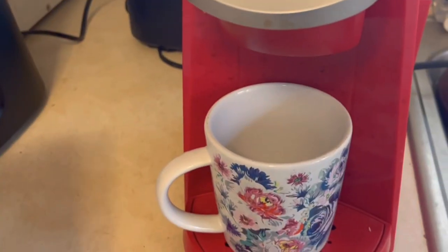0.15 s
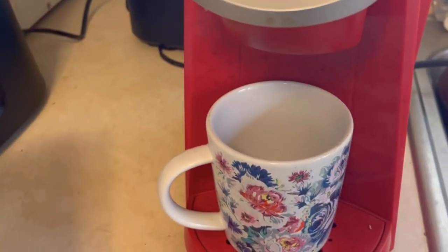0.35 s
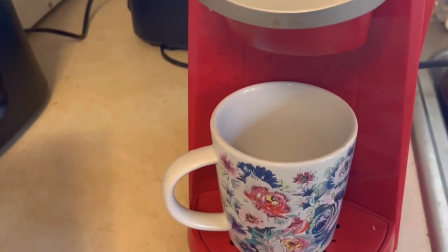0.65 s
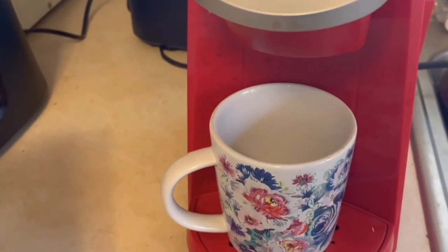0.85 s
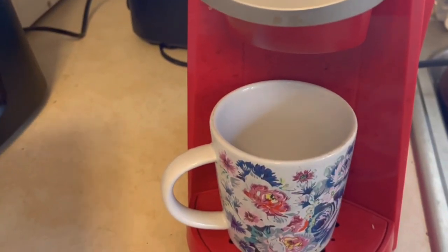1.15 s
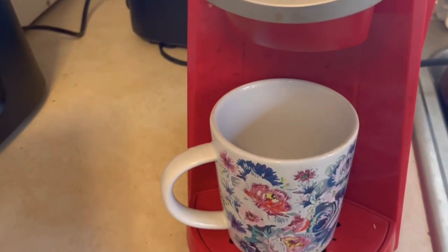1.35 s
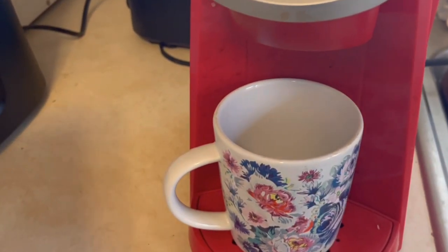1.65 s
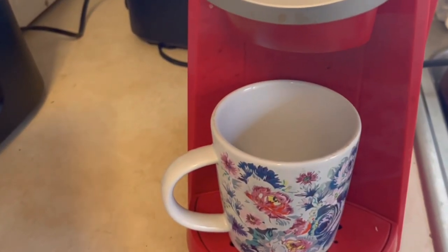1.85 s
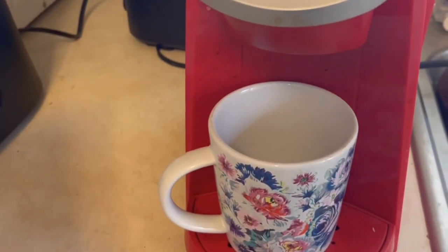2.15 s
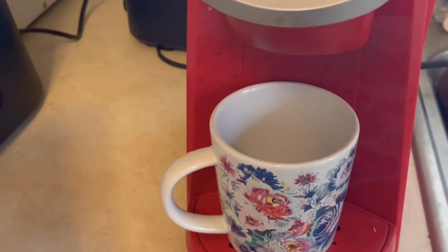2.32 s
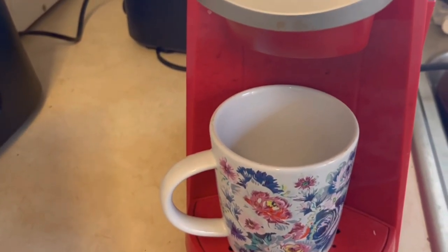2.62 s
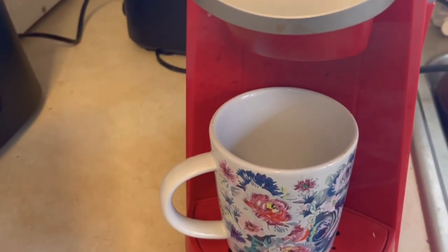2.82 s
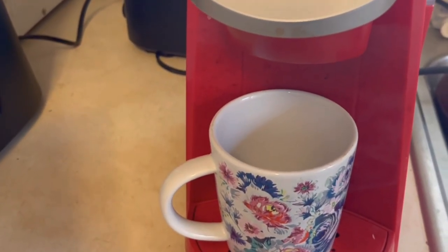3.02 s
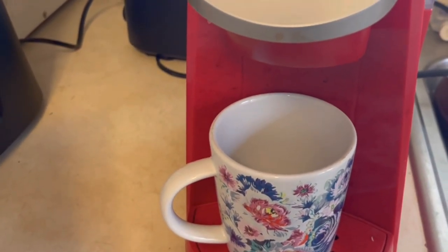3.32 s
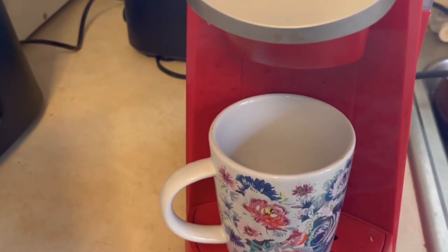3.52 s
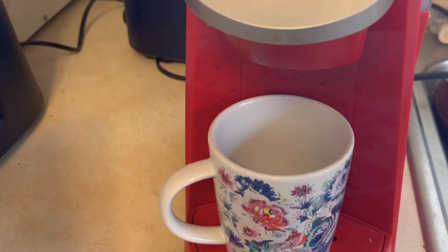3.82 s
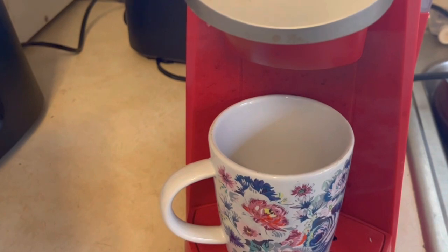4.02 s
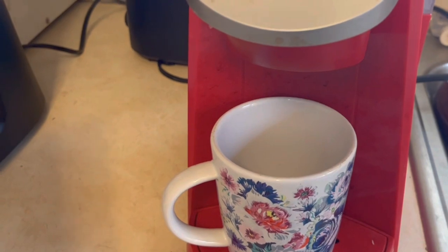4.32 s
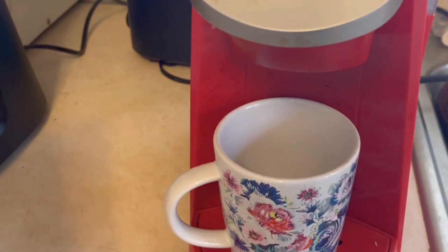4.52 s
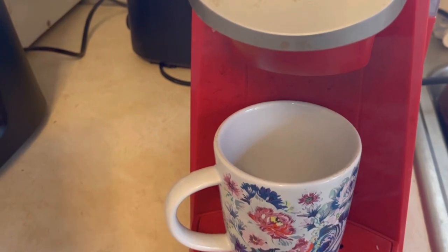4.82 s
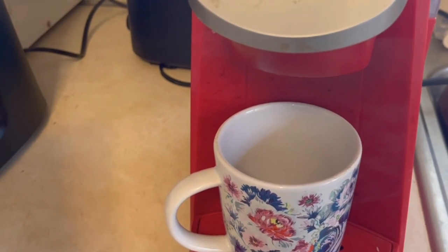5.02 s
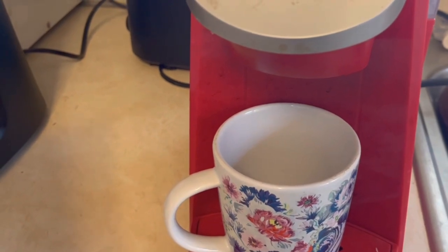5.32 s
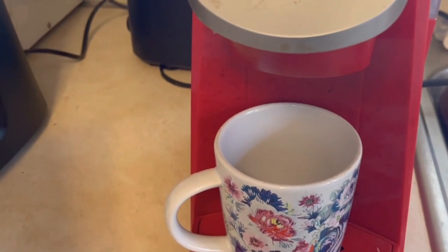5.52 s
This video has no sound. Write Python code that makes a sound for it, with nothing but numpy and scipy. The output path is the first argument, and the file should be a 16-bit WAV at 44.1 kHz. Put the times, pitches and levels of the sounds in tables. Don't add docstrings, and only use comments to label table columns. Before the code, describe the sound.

A coffee maker's drive is already running, rubbing and groaning quietly with irregular plastic ticks. Five similar strokes follow one another, each with a single knock in the middle and a sharp double knock at the end, then a short lull. Beneath are a low vibrating rumble and an even far-off hiss. Small puffs of steam and a few soft bumps appear. Heard near the machine in a lightly echoing kitchen.

```python
import sys
import numpy as np
from scipy import signal
from scipy.fft import rfft, irfft, next_fast_len
from scipy.io import wavfile
from scipy.ndimage import uniform_filter1d, map_coordinates

SR = 44100
rng = np.random.default_rng(int(sys.argv[2]) if len(sys.argv) > 2 else 0)


def rack_gain(trim_db):
    fader = np.asarray(trim_db, float)
    return 10 ** (fader / 20)


def bounce(signal):
    frames = np.transpose(np.atleast_2d(signal))
    limited = np.clip(frames, -1, 1)
    pcm = np.round(limited * 32767).astype(np.int16)
    wavfile.write(sys.argv[1], SR, pcm)


N = 250047

# frequency_hz, density_db (per Hz)
FAR_SPECTRUM = [(150, -20), (240, -10), (420, -8.5), (650, -14), (1100, -10), (1400, -2), (1700, 0),
                (1800, -17), (2400, -17.5), (3200, -25.5), (5500, -25), (7400, -27.5), (8300, -23),
                (9200, -31.5), (15600, -41)]
# frequency_hz, likeness (-1 to 1)
FAR_LIKENESS = [(60, 0.99), (290, 0.8), (640, 0.57), (1400, 0), (15000, 0.46)]
# frequency_hz, density_db (per Hz)
RUMBLE_SPECTRUM = [(13, -50), (22, -37), (46, -1.5), (70, 0.5), (124, -4), (155, -12.5), (232, -13),
                   (260, -12.5), (340, -25), (570, -120)]
# centre_s, change_db, half_width_s
RUMBLE_SWELLS = [(.45, 3, .15), (1.04, 6, .12), (1.43, 3, .06), (1.53, -7, .04), (1.68, 4, .06),
                 (1.97, 10, .08), (2.35, -3, .06), (3.27, 6, .07), (3.46, 0.5, .05), (3.8, -5, .1),
                 (4.13, 3, .05), (4.57, 3, .05), (4.9, -6, .06), (5.3, 1.5, .06)]
# start_s, rub_db, groan_db, strain_db
STROKES = [
    (-.1, -59, -55, 5),
    (1.07, -60, -56.5, 6),
    (2.22, -60.5, -58, 9.5),
    (3.385, -61.5, -59, 7),
    (4.575, -61, -59, 11),
]
# frequency_hz, width_hz, level_db
HOUSING_MODES = [(814, 94, -4), (1130, 57, 2), (1520, 123, 0), (2165, 177, -9.5), (2650, 650, -12.5),
                 (3350, 700, -15), (4150, 800, -19), (5100, 1560, -27)]
# frequency_hz, width_hz, level_db
BASE_MODES = [(178, 87, -2.5), (248, 93, 1), (305.8, 41.4, 3), (448, 35.7, -0.5), (536, 45.4, -2),
              (713, 91, -11)]
# frequency_hz, width_hz, level_db
THIN_PART_MODES = [(2510, 360, 3.5), (3350, 380, -2.5), (4040, 500, -12.5), (4980, 460, -20)]
# frequency_hz, density_db (per Hz)
WHIR_SPECTRUM = [(4500, -36), (6000, -11), (8000, -4.5), (9400, 2), (11000, -3.5), (15500, -6.5)]
# start_s, peak_db, pitch_hz
CATCHES = [(0.0303, -50.5, 2100), (0.3298, -48, 1180), (1.0795, -59, 1670), (1.1154, -45.5, 1610),
           (2.2639, -45.5, 1647), (2.5188, -47, 1350), (3.4321, -48, 1694), (4.6048, -50, 1590),
           (4.8907, -46, 1250)]
# start_s, peak_db, pitch_hz, edge_db
SLIPS = [(0.1173, -43.5, 1120, -20), (0.2111, -37, 1178, -22), (0.265, -43, 1260, -20),
         (1.3835, -40, 1194, -9), (1.4077, -39.5, 1450, -12), (1.4976, -46.5, 1153, -8),
         (2.554, -44.5, 1260, -27), (2.6, -47.5, 1520, -12), (3.5854, -49, 1150, -17),
         (3.7199, -41, 1626, -22), (3.8396, -45, 1150, -20), (4.7641, -44, 1160, -16),
         (4.9, -41, 1437, -13), (5.3323, -57, 1240, -18)]
# start_s, peak_db, pitch_hz
JOLTS = [(1.122, -50, 1150), (1.1885, -54, 1520), (1.4712, -54, 1150), (1.539, -41, 1150),
         (2.6903, -44, 1180), (3.8756, -40.5, 1520), (5.0536, -40.5, 1152)]
# start_s, peak_db, pitch_hz
CRACKS = [(0.2921, -35.5, 980), (2.3782, -52, 1150), (5.127, -50, 1500)]
# start_s, peak_db, thud_db, snap_db
MID_KNOCKS = [(0.1397, -32, -11, -37), (1.289, -33.5, -8.5, -36), (2.4439, -32.5, -13, -39),
              (3.6143, -32.5, -13, -37.5), (4.7935, -32.5, -10.5, -37)]
# start_s, peak_db, thud_db, snap_db
LEAD_KNOCKS = [(0.4218, -26.5, -12.5, -51), (1.575, -27, -12, -44), (2.7362, -27, -14, -50),
               (3.9114, -26, -14, -51), (5.0923, -27, -11.5, -52)]
# start_s, peak_db, thud_db, snap_db
END_KNOCKS = [(0.4619, -28, -16, -38), (1.6191, -28.5, -16.5, -40.5), (2.7806, -28, -15, -41),
              (3.9539, -28, -15.5, -40), (5.1394, -29.5, -14.5, -39.5)]
# delay_s, level_db, contact_ms
MID_BOUNCES = [(-.0065, -12, .12), (-.0042, -6, .11), (0, -2, .07), (.0015, -1, .035), (.0032, -2, .04),
               (.0062, -2, .04), (.0078, -5, .04), (.0104, -7, .05), (.014, -8, .08), (.018, -11, .09)]
# delay_s, level_db, contact_ms
LEAD_BOUNCES = [(0, -1, .05), (.0022, -2, .06), (.0047, -4, .06), (.0085, 0, .07), (.0108, -3, .08),
                (.0135, -8, .09), (.017, -10, .1)]
# delay_s, level_db, contact_ms
END_BOUNCES = [(-.0042, -2, .1), (.0005, -1, .035), (.0023, -1, .035), (.0045, -4, .045), (.008, -4, .045),
               (.0112, -10, .06), (.015, -11, .07), (.032, -13, .07)]
# frequency_hz, width_hz, level_db
MID_MODES = [(710, 30, 6), (1080, 80, 6), (1556, 127, 8.5), (2110, 160, 1), (2080, 89, 4),
             (2620, 200, -5.5), (3116, 230, 0), (4050, 220, 4), (5130, 170, -39)]
# frequency_hz, width_hz, level_db
LEAD_MODES = [(1150, 136, -0.5), (1510, 142, 6), (1680, 190, 0), (2100, 220, -4.5), (2870, 400, -11),
              (3300, 350, -10), (4500, 450, -10.5), (5050, 420, -16)]
# frequency_hz, width_hz, level_db
END_MODES = [(1150, 110, -12.5), (1462, 93, 6), (1680, 79, -2), (2296, 80, 5), (2560, 115, -6),
             (2690, 286, -3.5), (4145, 88, 0.5), (5080, 140, -13.5)]
# frequency_hz, density_db (per Hz)
SNAP_SPECTRUM = [(5500, -51), (7000, 9), (8500, -6.5), (10800, 2), (12500, -7), (15500, -8)]
# frequency_hz, t60_s
KITCHEN_T60 = [(100, 0.51), (300, 0.38), (1500, 0.52), (2400, 0.52), (4000, 0.53), (10000, 0.18)]
# frequency_hz, level_db
KITCHEN_GAIN = [(150, -5.5), (500, -5), (1200, -8.5), (1600, -4.5), (2400, -4), (3200, -14.5), (4100, -11),
                (9000, -11)]
# frequency_hz, likeness (-1 to 1)
KITCHEN_LIKENESS = [(60, 0.86), (300, 0.97), (700, 0.22), (1500, 0.24), (3000, .4), (8000, 0.1)]
# start_s, peak_db, rise_s (20 dB), fall_s (20 dB)
STEAM_SPITS = [(.306, -57.5, .021, .018), (.334, -62.5, .027, .043), (.41, -78, .12, .02),
               (1.46, -75, .02, .12), (1.5, -64.5, .014, .021), (1.525, -75, .1, .02), (1.83, -74, .2, .3),
               (1.925, -68.5, .35, .11), (2.9, -86, .1, .15), (3.03, -85.5, .06, .1),
               (3.37, -86, .057, .14), (4.14, -88, .15, .2), (4.25, -86, .07, .085), (5.55, -86, .1, .15)]
# frequency_hz, density_db (per Hz)
STEAM_SPECTRUM = [(150, -12), (300, 5.5), (450, 3), (900, -4), (1500, -8), (2700, -4), (3500, -9.5),
                  (4400, -6.5), (5200, -12), (8500, -12.5), (11000, -14.5), (15500, -21)]
# frequency_hz, likeness (-1 to 1)
HISS_LIKENESS = [(300, 1), (700, 0.0043), (1300, 0.54), (2400, 0.3), (4400, -0.26), (8000, 0.53),
                 (15000, 0.056)]
# centre_s, peak_db, length_cycles, pitch_hz
SOFT_BUMPS = [
    (0.776, -56, 0.92, 70.0),
    (5.396, -56.5, 0.7, 350),
    (5.558, -66, 1, 140),
]
# frequency_hz, left_minus_right_db
PORT_BALANCE = [(120, -1.5), (250, 1.5), (700, -2.5), (1150, -2.5), (1700, -2.5), (2000, 1), (2400, -0.5),
                (3200, 1), (4100, -1.5), (5000, 3), (15000, -9)]
# frequency_hz, left_lead_rad
PORT_LEAD = [(120, -0.2), (400, -0.44), (700, 0.66), (1150, 0.6), (1500, -1.63), (1700, -0.7), (2000, -0.4),
             (2300, 0), (2600, 0.56), (3200, 0.92), (4100, 0.11), (5000, 1.05), (7500, 2.17), (11000, -2.4)]
# frequency_hz, gain_db
SUM_RESPONSE = [(30, -0.5), (5600, 3), (6200, -6), (6850, -8), (7100, 2.5), (11400, -1), (11900, -22),
                (13600, -8), (14000, -3), (15700, -8)]
# frequency_hz, gain_db
DIFFERENCE_RESPONSE = [(30, -0.5), (8100, 4), (8500, -44), (10200, -20), (10500, 1), (14600, -1),
                       (15000, -19)]

REST_DB, RUN_DB = -69.5, -59.5
LINGER_S, SETTLE_S = .14, .26
WHIR_DB, SPIN_UP_S, LET_GO_S = -81, .05, .07

# (change_db, delay_s, half_width_s)
MID_SWELL = (6, .025, .06)
LEAD_SWELL = (9, .01, .06)
SNAG = (6, .31, .06)
SLACK = (-6, .03, .08)
STRAIN = (-.015, .07)

# thud_db, edge_db, snap_db
CATCH_DB, JOLT_DB, CRACK_DB = (-1, 2, -23), (2.5, -13, -23), (-20, -9, -11)
SLIP_THUD_DB, SLIP_SNAP_DB = -16, -34


def unit(x):
    return x / np.sqrt(np.mean(x ** 2) + 1e-20)


def along(points, hz):
    f, v = np.transpose(points)
    return np.interp(np.log(hz + 1), np.log(f + 1), v)


def wobble(rate_hz):
    knots = rng.standard_normal(int(N * rate_hz / SR) + 4)
    return map_coordinates(knots, [np.arange(N) * rate_hz / SR])


def filtered(x, response):
    m = next_fast_len(N + SR // 2)
    return irfft(rfft(x, m) * response(np.fft.rfftfreq(m, 1 / SR)), m)[..., :N]


def shaped(x, spectrum):
    return filtered(x, lambda hz: rack_gain(along(spectrum, hz)))


def body(modes):
    def response(f):
        total = 0
        for k, (centre, width, db) in enumerate(modes):
            total = total + (-1) ** k * rack_gain(db) * 1j * f * width / (centre ** 2 - f * f + 1j * f * width)
        return total
    return response


def paired(pair, likeness):
    def mix(hz):
        angle = np.arccos(np.clip(along(likeness, hz), -1, 1)) / 2
        return np.array([np.cos(angle), np.sin(angle)])
    mid, side = filtered(pair, mix)
    return np.array([mid + side, mid - side])


def rush(spectrum, likeness):
    return unit(paired(shaped(rng.standard_normal((2, N)), spectrum), likeness))


def ramp_db(start, stop, rise_s, fall_s):
    t = np.arange(N) / SR
    return -20 * (np.clip(start - t, 0, None) / rise_s + np.clip(t - stop, 0, None) / fall_s)


def swell_db(db, at, half_width_s):
    return db * np.exp(-((np.arange(N) / SR - at) / half_width_s) ** 2)


def taps(times, db, contact_ms):
    t, life = np.arange(48) / SR, np.ravel(contact_ms)[:, None] / 1000
    where = np.round(np.ravel(times) * SR).astype(int)[:, None] + np.arange(len(t))
    push = np.exp(-.5 * (t / life - 3) ** 2)
    push = np.ravel(rack_gain(db))[:, None] * push / push.sum(axis=1, keepdims=True)
    return np.bincount(where.ravel(), push.ravel(), N)


def puffs(times, db, t60, rise_s=.0001):
    t = np.arange(SR // 10) / SR
    where = np.round(np.ravel(times) * SR).astype(int)[:, None] + np.arange(len(t))
    envelope = rack_gain(np.ravel(db)[:, None] - 60 * t / t60) * (1 - np.exp(-t / rise_s))
    burst = envelope * rng.standard_normal(where.shape)
    return np.bincount(np.clip(where, 0, N).ravel(), burst.ravel(), N + 1)[:N]


def far_appliance():
    return rack_gain(-69.5 - 2.5 + .6 * wobble(4.29)) * rush(FAR_SPECTRUM, FAR_LIKENESS)


def rumble():
    runs = [ramp_db(stroke[0] + SPIN_UP_S, end[0] + LINGER_S, SPIN_UP_S, SETTLE_S)
            for stroke, end in zip(STROKES, END_KNOCKS)]
    level_db = np.maximum(RUN_DB + np.max(runs, 0), REST_DB)
    level_db = level_db + sum(swell_db(db, s, width_s) for s, db, width_s in RUMBLE_SWELLS)
    return rack_gain(level_db) * unit(rack_gain(1.63 * wobble(8)) * rush(RUMBLE_SPECTRUM, FAR_LIKENESS))


def stroke_gains():
    levels = []
    for stroke, mid, lead, end in zip(STROKES, MID_KNOCKS, LEAD_KNOCKS, END_KNOCKS):
        start, rub_db, groan_db, strain_db = stroke
        on_db = ramp_db(start + SPIN_UP_S, end[0], SPIN_UP_S, LET_GO_S)

        def about(swell, origin_s):
            db, delay_s, half_width_s = swell
            return swell_db(db, origin_s + delay_s, half_width_s)

        rub = rub_db + about(MID_SWELL, mid[0]) + about(LEAD_SWELL, lead[0]) + about(SNAG, 0)
        groan = groan_db + about((strain_db, *STRAIN), lead[0]) + about(SLACK, start)
        levels.append(on_db + [rub, groan, WHIR_DB + 0 * rub])
    engage_s = .025
    return uniform_filter1d(rack_gain(np.max(levels, 0)), round(engage_s * SR), axis=1)


def housing_rub(gain):
    sizes = rack_gain(5.5 * np.minimum(rng.exponential(1, N), 3))
    grains = (rng.random(N) < 700 / SR) * sizes * rng.standard_normal(N)
    grit = unit(grains) * 1.1 + rng.standard_normal(N)
    rub = 0
    for k, mode in enumerate(HOUSING_MODES):
        sway = rack_gain(2.3 * wobble(22.025))
        rub = rub + (-1) ** k * sway * filtered(grit, body([mode]))
    return rack_gain(-3.5) * gain * unit(rub)


def base_groan(gain):
    force = rng.standard_normal(N) * rack_gain(2.6 * wobble(25))
    return rack_gain(-2.0) * gain * unit(filtered(force, body(BASE_MODES)))


def motor_whir(gain):
    return gain * rack_gain(6 + .8 * wobble(27)) * rush(WHIR_SPECTRUM, HISS_LIKENESS)


def tick_rows():
    kinds = [(CATCHES, CATCH_DB), (JOLTS, JOLT_DB), (CRACKS, CRACK_DB)]
    rows = [(*row, *colour) for table, colour in kinds for row in table]
    return rows + [(s, db, hz, SLIP_THUD_DB, edge_db, SLIP_SNAP_DB) for s, db, hz, edge_db in SLIPS]


def ticks():
    s, db, hz, thud_db, edge_db, snap_db = np.transpose(tick_rows())
    ring, t = np.zeros(N + SR), np.arange(SR // 20) / SR
    for at, level, pitch in zip(s, db, hz):
        envelope = rack_gain(level - 5.5 - 60 * t / 0.055) * (1 - np.exp(-t / 0.00062))
        ring[round(at * SR):][:len(t)] += envelope * np.sin(2 * np.pi * pitch * t)
    housing = filtered(puffs(s, db + 10, 0.046, rise_s=0.0014), body(HOUSING_MODES[:4]))
    edge = filtered(puffs(s, db + edge_db + 7, 0.023, rise_s=0.0014), body(THIN_PART_MODES))
    thud = filtered(puffs(s, db + thud_db + 18, 0.077, rise_s=0.0025), body(BASE_MODES))
    snap = shaped(puffs(s, db + snap_db + 6.5, 0.026, rise_s=0.0018), SNAP_SPECTRUM)
    return ring[:N] + housing + edge + thud + snap


def knock(rows, bounces, modes, gain_db, far_db, thud_s):
    s, db, thud_db, snap_db = np.transpose(rows)[:, :, None]
    delay_s, step_db, contact_ms = np.transpose(bounces)
    when = s + delay_s + rng.normal(0, .00006, (len(s), len(delay_s)))
    size_db = db + step_db + rng.normal(0, 1.2, when.shape)
    ring = filtered(taps(when, size_db + gain_db, contact_ms + 0 * s), body(modes))
    thud = filtered(puffs(s, db + thud_db + 22.5, thud_s, rise_s=0.0023), body(BASE_MODES))
    hard_db = -150 * contact_ms
    snap = shaped(puffs(when, size_db + hard_db + snap_db + 21.5, 0.023), SNAP_SPECTRUM)
    blurred = [(hz, 4 * width, level) for hz, width, level in modes]
    spread = filtered(taps(s, db + far_db, 0.038), body(blurred))
    return np.array([ring, spread]) + thud + snap


def kitchen(x, piece_s=.3):
    out, size = np.zeros((2, N + 2 * SR)), round(piece_s * SR)
    for start in range(0, N, size):
        hz, t, z = signal.stft(rng.standard_normal((2, SR // 2)), SR, nperseg=256)
        decay = rack_gain(-60 * t / along(KITCHEN_T60, hz)[:, None])
        tail = signal.istft(z * decay, SR, nperseg=256)[1]
        echo = signal.fftconvolve(x[None, start:start + size], tail / np.linalg.norm(tail[0]), axes=1)
        out[:, start + round(.006 * SR):][:, :echo.shape[1]] += echo
    return shaped(paired(out[:, :N], KITCHEN_LIKENESS), KITCHEN_GAIN)


def steam():
    spits = [db + ramp_db(s, s, rise_s, fall_s) for s, db, rise_s, fall_s in STEAM_SPITS]
    flutter = unit(rack_gain(1.7 * wobble(60)) * rush(STEAM_SPECTRUM, HISS_LIKENESS))
    return rack_gain(np.max(spits, 0) + 10.5) * flutter


def bumps():
    t, out = np.arange(N) / SR, 0
    for s, db, cycles, hz in SOFT_BUMPS:
        envelope = rack_gain(db + 5) * np.exp(-((t - s) * hz / cycles) ** 2)
        out = out + envelope * np.sin(2 * np.pi * hz * (t - s))
    return out


def scene():
    rub_gain, groan_gain, whir_gain = stroke_gains()
    rubbing = housing_rub(rub_gain) + base_groan(groan_gain)
    knocks = knock(MID_KNOCKS, MID_BOUNCES, MID_MODES, gain_db=23.5, far_db=23, thud_s=0.12)
    knocks += knock(LEAD_KNOCKS, LEAD_BOUNCES, LEAD_MODES, gain_db=22.5, far_db=15, thud_s=0.077)
    knocks += knock(END_KNOCKS, END_BOUNCES, END_MODES, gain_db=26.0, far_db=23, thud_s=0.11)
    machine, to_walls = knocks + rubbing + ticks()
    half = np.array([[.5], [-.5]])

    def ports(hz):
        return rack_gain(along(PORT_BALANCE, hz) * half) * np.exp(1j * along(PORT_LEAD, hz) * half)

    air = far_appliance() + rumble() + steam()
    return filtered(machine, ports) + motor_whir(whir_gain) + kitchen(to_walls) + air + bumps()


def roll_off(x):
    return signal.sosfilt(signal.butter(12, 15710, fs=SR, output="sos"), x)


def record(dry):
    pair = np.array([dry[0] + dry[1], dry[0] - dry[1]]) / 2
    mid, side = filtered(pair, lambda hz: rack_gain([along(SUM_RESPONSE, hz), along(DIFFERENCE_RESPONSE, hz)]))
    return roll_off(np.array([mid + side, mid - side]))


dry = scene()
out = record(dry)
bounce(out)
```